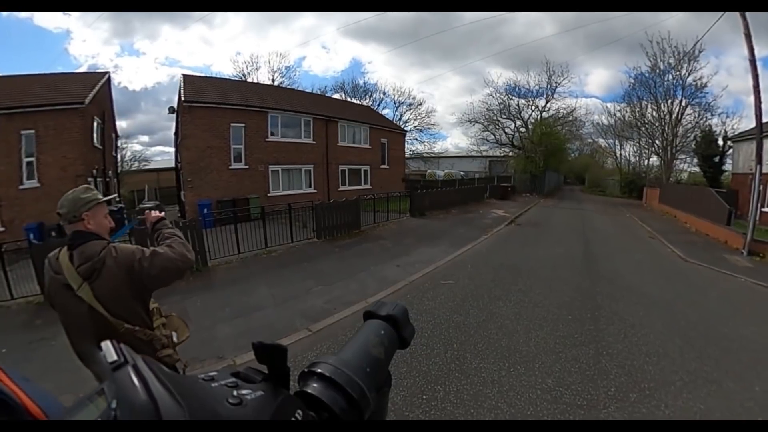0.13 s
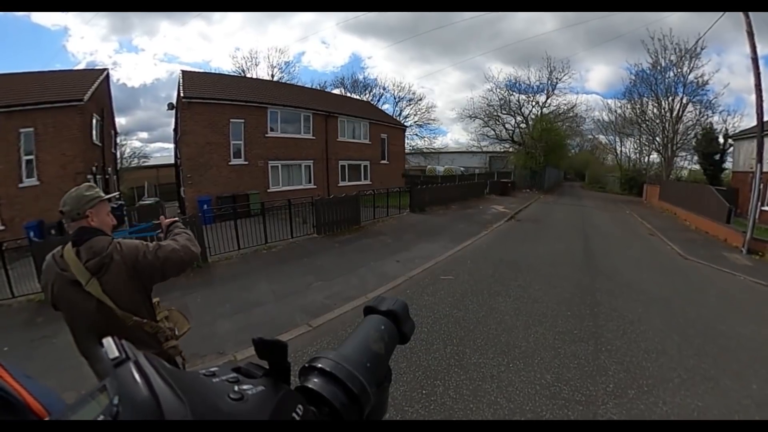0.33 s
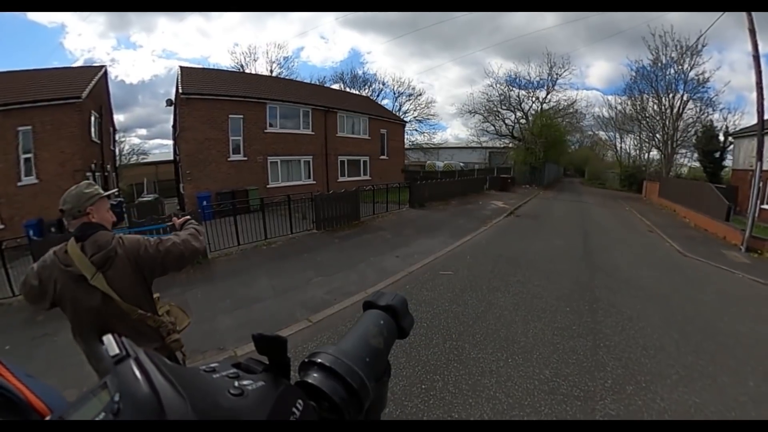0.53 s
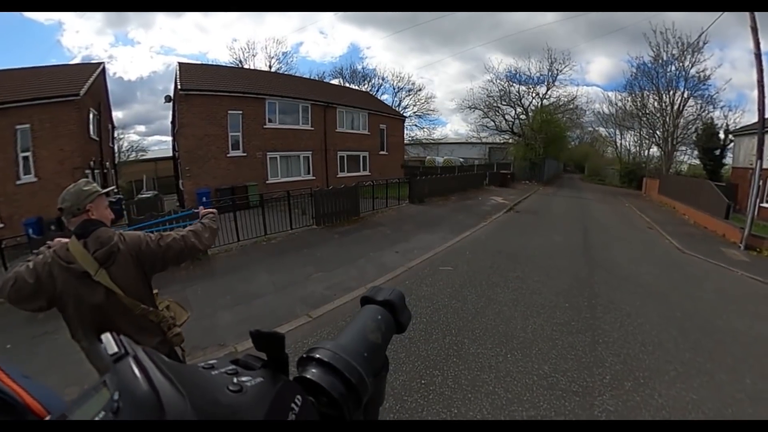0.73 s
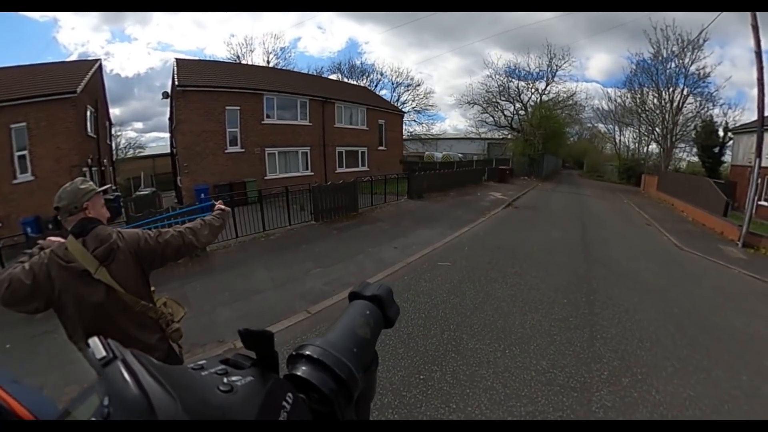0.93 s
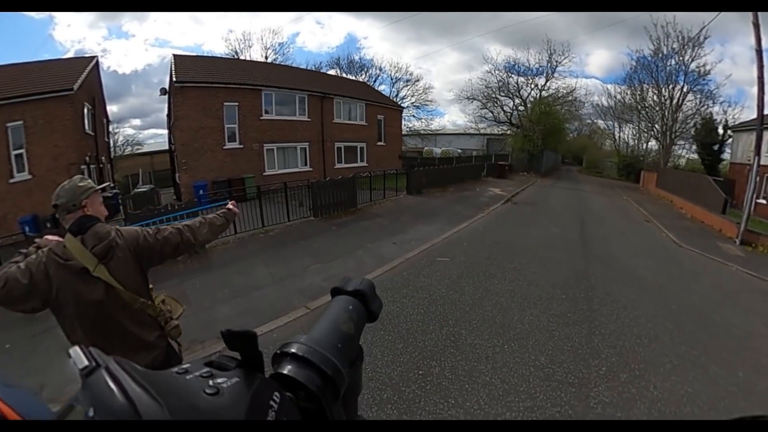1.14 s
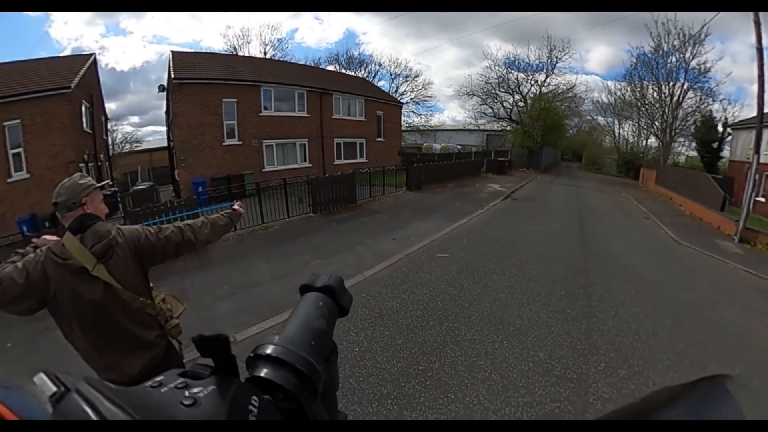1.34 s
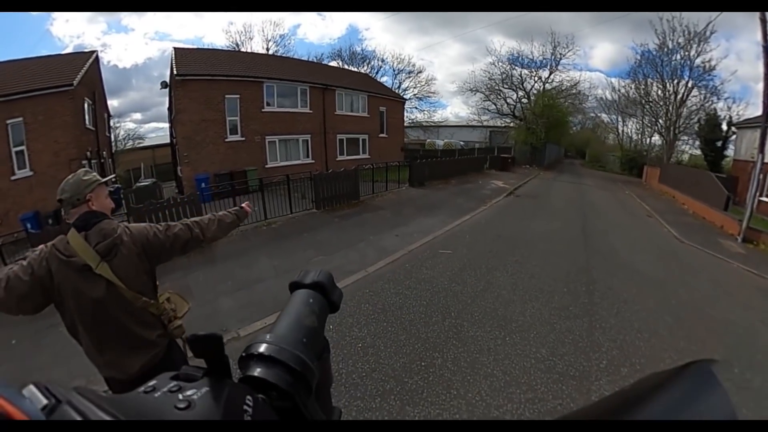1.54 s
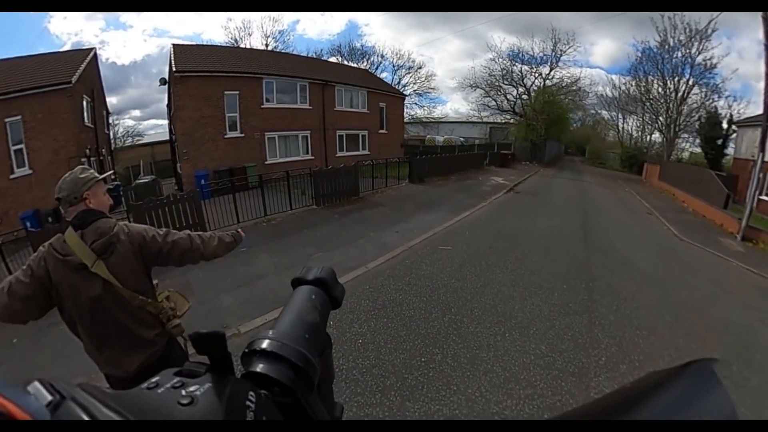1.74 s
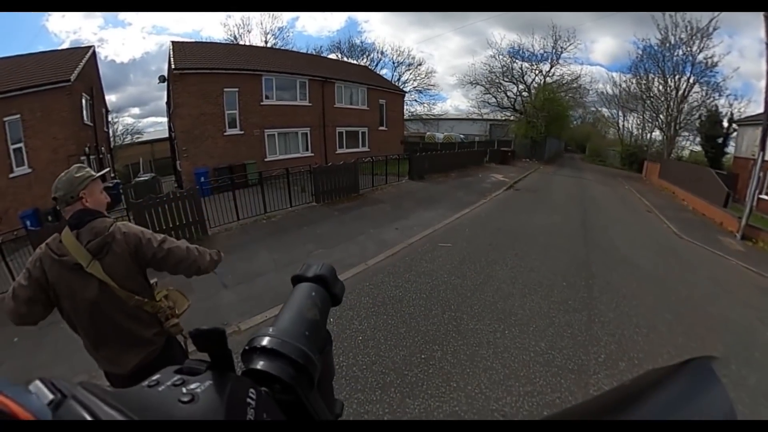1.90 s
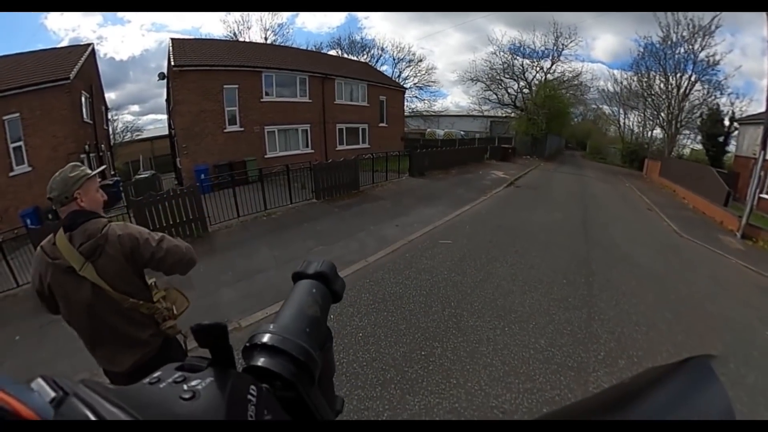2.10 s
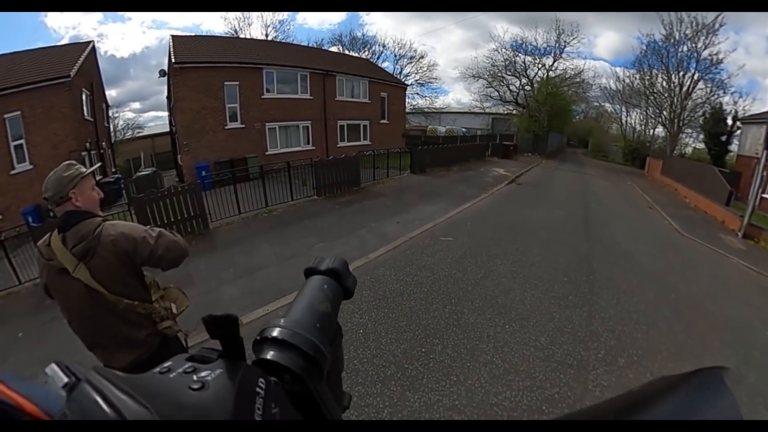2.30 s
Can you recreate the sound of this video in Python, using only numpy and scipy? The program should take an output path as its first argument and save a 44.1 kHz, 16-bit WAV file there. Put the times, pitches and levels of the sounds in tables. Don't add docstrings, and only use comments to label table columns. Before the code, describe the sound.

Over faint traffic, a passing engine drone, sleeve rustle and wind thumps, a slingshot fires with a bright close snap, then a farther crackle and wooden clatter ring out along a residential street.

```python
import sys
import numpy as np
from scipy import signal
from scipy.fft import rfft, irfft, next_fast_len
from scipy.io import wavfile
from scipy.ndimage import uniform_filter1d

SR = 44100
rng = np.random.default_rng(int(sys.argv[2]) if len(sys.argv) > 2 else 0)


def ratio(d):
    e = np.asarray(d, float) / 20
    return 10 ** e


def dump_mix(stems):
    frames = np.atleast_2d(stems).T
    limited = np.clip(frames, -1, 1)
    pcm = np.round(limited * 32767).astype(np.int16)
    wavfile.write(sys.argv[1], SR, pcm)


N = 108309


def evened(x):
    return x / np.sqrt(np.mean(x ** 2) + 1e-20)


def read(points, hz):
    f, value = np.transpose(points)
    return np.interp(np.log(hz + 1), np.log(f + 1), value)


def curve(points):
    return ratio(np.interp(np.arange(N) / SR, *np.transpose(points)))


def shaped(x, points):
    hz = np.fft.rfftfreq(len(x), 1 / SR)
    return irfft(rfft(x) * ratio(read(points, hz)), len(x))


def coloured(x, points):
    return evened(shaped(x, points))


def add(mix, s, sound):
    part = mix[round(s * SR):][:len(sound)]
    part += sound[:len(part)]


def resonate(x, hz, width):
    turn = np.exp(2j * np.pi * np.cumsum(hz * np.ones(len(x))) / SR)
    r = np.exp(-np.pi * width / SR)
    return 2 * (turn * signal.lfilter([1 - r], [1, -r], x / turn)).real


def lumps(size):
    smooth = uniform_filter1d(rng.standard_normal(N), size)
    return evened(uniform_filter1d(smooth, size))


def grains(share, spread_db):
    size = ratio(spread_db * np.minimum(rng.exponential(1, N), 4))
    clicks = (rng.random(N) < share) * size
    return rng.standard_normal(N) * (0.59 + clicks)


def snaps(rows, gain_db, grit, wobble):
    t, out = np.arange(3000) / SR, np.zeros(N)
    for (s, db, hz, ring), n in zip(rows, rng.standard_normal((len(rows), 3000))):
        turns = np.cumsum(1 + wobble * uniform_filter1d(n, size=7)) * hz / SR
        rough = grit * evened(resonate(resonate(n[::-1], hz, .4 * hz), hz, .6 * hz))
        decay = ratio(gain_db + db + 3 - 60 * t / ring)
        attack = np.minimum(t / .0004, 1)
        add(out, s, decay * attack * (np.sin(2 * np.pi * turns) + rough))
    return out


# frequency_hz, level_db
TRAFFIC_COLOUR = [(60, -23.5), (110, -10), (180, -7), (400, -19), (800, -18.5), (1050, -14), (1700, -20.5),
                  (2600, -36.5), (4200, -51), (9000, -73)]


def traffic():
    roar = coloured(rng.standard_normal(N), TRAFFIC_COLOUR)
    slope = np.std(np.diff(roar, prepend=0))
    return roar / slope * ratio(-57.5 - 17.0 + 0.81 * lumps(size=3000))


# time_s, level_db
ENGINE_LEVEL = [(0, -62.5), (.3, -56.5), (.55, -53.5), (.85, -49.5), (1.05, -58), (1.6, -70), (2.456, -63)]
# order, level_db
ENGINE_ORDERS = [(2, 1.5), (3, -6), (4, -11), (5, -13), (6, -19.5)]


def engine():
    crank_hz = 52
    turns = np.cumsum(crank_hz * (1 + 0.0074 * lumps(size=4000))) / SR
    drone = np.zeros(N)
    for order, db in ENGINE_ORDERS:
        drone += ratio(db + 3.1 * lumps(size=1500)) * np.sin(2 * np.pi * order * turns)
    return ratio(-3.0) * curve(ENGINE_LEVEL) * drone


# time_s, level_db
WIND_LEVEL = [(0.0, -58), (0.1, -53), (0.48, -50.5), (0.97, -50.5), (1.43, -43), (2.02, -55), (2.3, -51),
              (2.46, -35)]
# frequency_hz, level_db
WIND_COLOUR = [(8, -8), (22, -2), (40, -7), (70, -14), (140, -22.5), (300, -33), (600, -89)]


def wind():
    eddies = rng.standard_normal(N) * ratio(1.6 * lumps(size=1200))
    return curve(WIND_LEVEL) * coloured(eddies, WIND_COLOUR)


# time_s, level_db
CLOTH_LEVEL = [(0, -82.5), (.2, -82), (.3, -76.5), (.45, -79.5), (.72, -77.5), (.82, -84.5), (.9, -76),
               (1.02, -73.5), (1.3, -74), (1.38, -76), (1.45, -82.5), (1.7, -77.5), (2.2, -75),
               (2.456, -74.5)]
# frequency_hz, level_db
CLOTH_COLOUR = [(1800, -30), (3000, -4.5), (4400, -5), (5200, 2.5), (7500, 1), (8200, -6.5), (10000, -9),
                (11500, -30)]


def cloth():
    return curve(CLOTH_LEVEL) * coloured(grains(.02, 2.3), CLOTH_COLOUR)


# peak_s, level_db, pitch_hz, length_s
GUSTS = [(0.459, -38, 27.6, 0.051), (0.561, -38.5, 40.4, 0.028), (0.69, -38, 26, 0.035),
         (0.735, -41, 30, .03), (1.063, -43, 28, 0.067), (1.22, -51, 29.4, 0.06), (1.285, -33.5, 33, 0.046),
         (1.285, -43.5, 169, 0.034), (1.379, -40, 46.3, 0.059), (1.433, -33, 21, .045),
         (1.48, -30, 21, 0.045), (1.528, -25, 26, 0.04), (1.579, -31, 30, .03), (1.736, -41.5, 25, 0.15),
         (1.91, -40, 29.2, 0.043), (1.967, -32, 33.6, 0.028), (2.059, -43, 35.6, 0.073),
         (2.385, -36, 31.3, 0.04), (2.421, -29, 23, 0.05)]


def gusts():
    out = np.zeros(N)
    for s, db, hz, length in GUSTS:
        t = np.arange(-length, length, 1 / SR)
        swell = np.exp(-(2.04 * t / length) ** 2)
        bend = 0.37 * np.sin(4 * np.pi * hz * t)
        add(out, s - length, -ratio(db) * swell * np.sin(2 * np.pi * hz * t + bend))
    return out


# frequency_hz, level_db
TICK_COLOUR = [(1200, -25), (2300, -8), (3500, -6), (5800, -10), (7000, -43), (12000, -55)]


def tick():
    start_s, level_db = .691, -86
    impulse = 1. * (np.arange(N) == round(start_s * SR))
    return ratio(level_db) * coloured(impulse, TICK_COLOUR)


# frequency_hz, level_db
SWISH_COLOUR = [(800, -6), (2000, -4), (3500, -5), (6500, 0), (9000, -1), (11000, -8), (15000, -14)]


def swish():
    start_s, end_s, level_db, rise_db, fade_db_s = 1.514, 1.537, -39.5, 27, 500
    time = np.arange(N) / SR - end_s
    shape_db = np.where(time < 0, rise_db * time / (end_s - start_s), -fade_db_s * time)
    level = (time > start_s - end_s) * ratio(level_db + shape_db)
    return level * coloured(rng.standard_normal(N), SWISH_COLOUR)


# start_s, level_db, pitch_hz, ring_s
CRACKS = [(1.5369, -12, 6900, .0045), (1.5366, -27, 2300, .005), (1.537, -25, 4000, .004),
          (1.5372, -33, 12500, .003), (1.5385, -31, 5600, .02), (1.5388, -31, 1800, .008),
          (1.5405, -31, 2300, .008), (1.5425, -31, 1900, .008), (1.5415, -35, 3700, .012),
          (1.5464, -29, 8600, .004), (1.5458, -22, 1800, .007), (1.547, -27, 3000, .006),
          (1.5495, -30, 1700, .008), (1.5518, -31, 1500, .01), (1.5522, -38, 7000, .006),
          (1.553, -40, 3000, .008), (1.557, -32, 1800, .01), (1.5578, -36, 7500, .02),
          (1.5582, -39, 3300, .015), (1.558, -28, 1000, .01), (1.5605, -30, 1900, .01),
          (1.5639, -15, 6000, .006), (1.5639, -24, 2600, .008), (1.564, -26, 1450, .012),
          (1.5643, -22, 3200, .009), (1.5648, -35, 13000, .004), (1.5655, -23, 7700, .014),
          (1.5664, -25, 5600, .008), (1.566, -26, 4500, .006), (1.5702, -29, 4800, .006),
          (1.57, -28, 2800, .008), (1.5698, -30, 1300, .014), (1.5704, -26, 7200, .006),
          (1.571, -35, 7900, .03), (1.5725, -38, 1200, .015), (1.5745, -41, 3200, .012),
          (1.586, -37, 5800, .012), (1.5865, -40, 7300, .012), (1.5865, -44, 8900, .01),
          (1.587, -46, 1900, .012), (1.5915, -41, 7500, .014), (1.597, -45, 3000, .012),
          (1.609, -46, 2000, .012), (1.622, -44, 5800, .01), (1.623, -45, 1600, .01),
          (1.6272, -45, 4900, .014), (1.6265, -44, 2900, .014), (1.698, -48, 2500, .01)]


def cracks():
    return snaps(CRACKS, gain_db=-3.1, grit=.25, wobble=.4)


# peak_s, level_db, length_s
SLAPS = [(1.5378, -26, .0008), (1.5391, -20, .0007), (1.5424, -22, .0018), (1.5462, -19, .0007),
         (1.5473, -18, .0006), (1.55, -29, .001), (1.5524, -32, .0007), (1.5572, -34, .0008),
         (1.5594, -31, .0007), (1.562, -23, .0016), (1.5641, -26, .0003), (1.5662, -31, .0012)]


def slaps():
    t, push = np.arange(2000) / SR, np.zeros(N)
    for s, db, length in SLAPS:
        u = (t - .004) / length * 2
        add(push, s - .004, -ratio(db - 8) * (1 - 1.58 * u ** 2) * np.exp(-u ** 2))
    pouch = ratio(3) * resonate(push, hz=1400, width=700)
    fork = ratio(9) * resonate(push, hz=226, width=62)
    return push + pouch + fork


# frequency_hz, level_db
TIPS_COLOUR = [(900, 0), (1400, 17), (2100, 0), (2800, -37), (4300, -16), (5800, 7), (8500, 4.5),
               (10500, -18.5), (14000, -23)]
# frequency_hz, level_db
WOOD_COLOUR = [(700, -3.5), (1500, 0.5), (2900, -3), (4200, -8.5), (5300, 1), (8000, -9), (10500, -16),
               (14000, -34)]


def twigs():
    start_s, hold_s, rise_s, level_db, fade_db_s = 1.8615, .057, .03, -49, 900
    t, drive = np.arange(N) / SR - start_s, grains(.03, 3.)
    mix = np.clip(t / rise_s, 0, 1) ** 2
    level = np.clip(t * 1000, 0, 1) * ratio(level_db - fade_db_s * np.maximum(t - hold_s, 0))
    tips = 0.49 * (1 - mix) * coloured(drive, TIPS_COLOUR)
    return level * (tips + mix * coloured(drive, WOOD_COLOUR))


# start_s, level_db, pitch_hz, ring_s
KNOCKS = [(2.018, -41, 6500, .006), (2.0185, -41, 4400, .006), (2.0185, -41, 1900, .008),
          (2.0222, -35, 6000, .01), (2.0228, -38, 4500, .014), (2.0225, -41, 7300, .006),
          (2.024, -45, 1650, .07), (2.033, -39, 4000, .012), (2.0348, -39, 2400, .012),
          (2.038, -31, 4100, .016), (2.0385, -35, 5200, .012), (2.0385, -42, 7800, .006),
          (2.041, -44, 2430, .06), (2.0445, -39, 5300, .01), (2.048, -40, 4300, .014),
          (2.051, -40, 1200, .012), (2.058, -44, 3900, .02), (2.064, -38, 4200, .014),
          (1.862, -42, 7300, .014), (2.0845, -44, 2430, .06), (2.085, -43, 3200, .008),
          (2.102, -44, 1100, .015), (2.121, -46, 2500, .008), (2.134, -47, 2550, .02),
          (2.138, -46, 1050, .035), (1.865, -41, 2000, .03), (1.8695, -46, 6600, .012)]


def knocks():
    return snaps(KNOCKS, gain_db=-4.5, grit=.4, wobble=.2)


# start_s, level_db, ring_db
RATTLE = [(2.017, -37, -12), (2.0214, -39, -14), (2.031, -40, -11), (2.0378, -40.5, 10.5),
          (2.046, -42.5, -6), (2.051, -50, -2), (2.064, -49, 9), (2.083, -67, 6), (2.088, -48, -13),
          (2.106, -51, 9.5), (2.138, -47, -4), (2.14, -53, 0)]
# frequency_hz, level_db, t60_s
FENCE_MODES = [(1600, -17.5, 0.048), (2410, -23, 0.08), (4260, -29, 0.017), (5600, -17.5, 0.011)]
# frequency_hz, level_db
SCRAPE_COLOUR = [(800, -10), (1500, -4), (2500, -9.5), (3200, -9.5), (4300, -3.5), (7000, -7),
                 (8500, -24.5), (12000, -52)]


def fence():
    scrape_t60_s, clatter_db, clatter_t60_s = 0.03, -50, 0.3
    t, time = np.arange(5000) / SR, np.arange(N) / SR - RATTLE[0][0]
    clatter = ratio(clatter_db - 60 * time.clip(0) / clatter_t60_s) * evened(grains(0.0068, 2.8))
    rings, scrapes = np.zeros(N), (time > 0) * clatter
    for s, db, ring_db in RATTLE:
        ring = np.zeros(5000)
        for hz, mode_db, t60 in FENCE_MODES:
            a, b = rng.standard_normal(2)
            decay = ratio(db + ring_db + mode_db + 2 * a - 60 * t / t60)
            ring += decay * np.sin(2 * np.pi * hz * (1 + 0.0047 * b) * t)
        add(rings, s, np.minimum(t / 0.00043, 1) * ring)
        add(scrapes, s, ratio(db - 9 - 60 * t / scrape_t60_s) * rng.standard_normal(5000))
    return rings + np.std(scrapes) * coloured(scrapes, SCRAPE_COLOUR)


def squeak():
    start_s, length_s, pitch_hz, rise_hz, level_db = 2.365, 0.071, 5400, 2300, -69.5
    u = np.clip((np.arange(N) / SR - start_s) / length_s, 0, 1)
    hz = pitch_hz + rise_hz * u
    tone = evened(resonate(resonate(rng.standard_normal(N), hz, 700), hz, 740))
    return ratio(level_db) * np.sin(np.pi * u) * tone


# frequency_hz, t60_s
STREET_DECAY = [(300, 0.72), (1000, 1), (3000, 0.62), (6000, 0.58), (10000, 0.6), (15000, 0.94)]


def street(x):
    taps = np.zeros((2, SR))
    at = np.arange(400, SR - 20, 20) + rng.integers(0, 20, (2, (SR - 401) // 20))
    np.put_along_axis(taps, at, rng.choice([-1., 1.], at.shape), 1)
    hz, t, z = signal.stft(taps, SR, nperseg=256)
    decay = ratio(-60 * t / read(STREET_DECAY, hz)[:, None])
    tail = signal.istft(z * decay, SR, nperseg=256)[1]
    return signal.fftconvolve(x[None], tail / np.linalg.norm(tail[0]), axes=1)[:, :N]


# frequency_hz, level_db
WIDTH_COLOUR = [(60, -40), (130, -15), (500, -9), (1500, -10), (4000, -1), (8000, 5), (13000, 17)]


def scene():
    air = traffic() + engine() + wind() + cloth() + gusts() + tick() + squeak()
    near = swish() + cracks() + slaps()
    far = twigs() + knocks() + fence()
    wet, side = street(ratio(-17) * near + ratio(-6.5) * far)
    side = side + np.roll(near + far, 40)
    side = ratio(-26) * shaped(side, WIDTH_COLOUR)
    return near + far + wet + air + np.array([side, -side])


def top_cut(x):
    return signal.sosfilt(signal.butter(12, 16000, fs=SR, output="sos"), x)


# frequency_hz, level_db
MIC_RESPONSE = [(3800, 0.5), (4700, -0.5), (5500, -1), (7800, -3), (9300, -3), (10500, -9), (13000, -12),
                (15000, -16), (16500, -51.5)]


def record(dry):
    size = next_fast_len(2 * N)
    mirrored = np.concatenate([dry, dry[:, ::-1]], axis=1)
    response = ratio(read(MIC_RESPONSE, np.fft.rfftfreq(size, 1 / SR)))
    heard = irfft(rfft(mirrored, size) * response, size)[:, :N]
    return top_cut(heard)


dry = scene()
out = record(dry)
dump_mix(out)
```